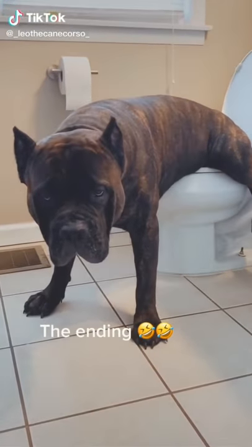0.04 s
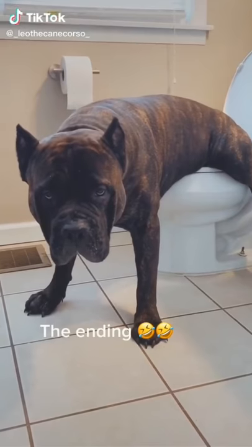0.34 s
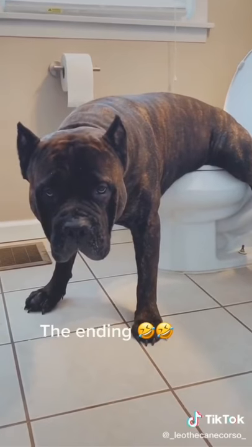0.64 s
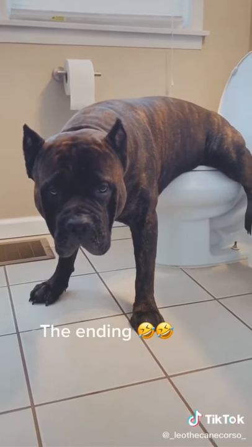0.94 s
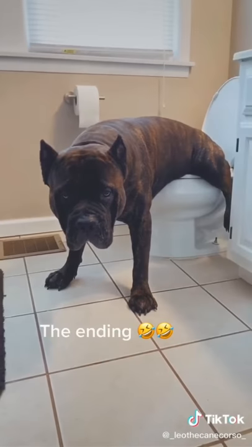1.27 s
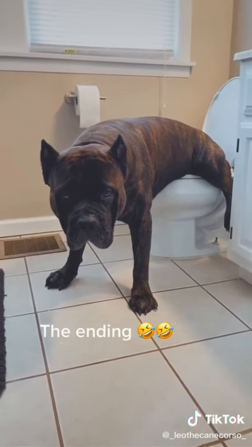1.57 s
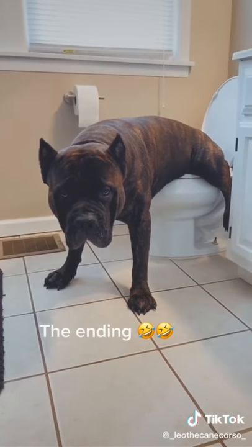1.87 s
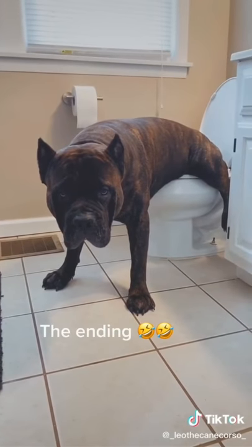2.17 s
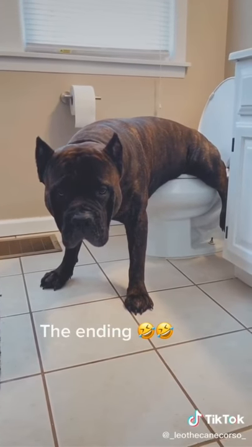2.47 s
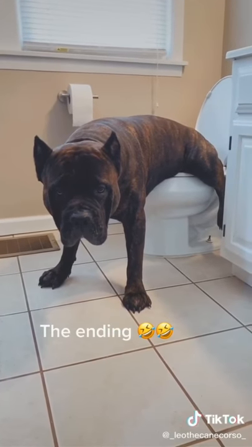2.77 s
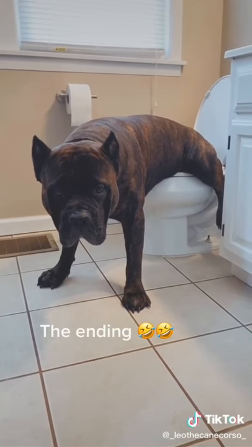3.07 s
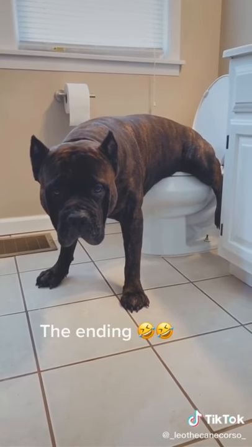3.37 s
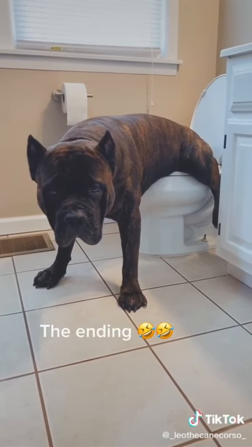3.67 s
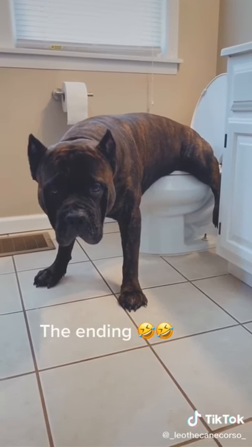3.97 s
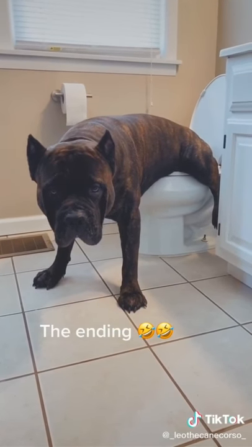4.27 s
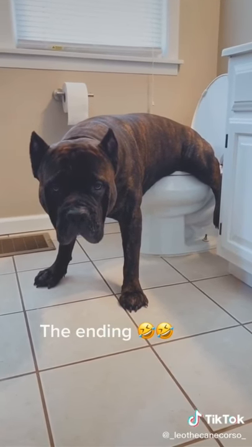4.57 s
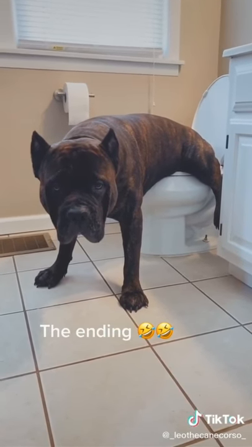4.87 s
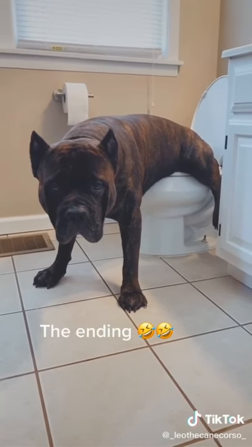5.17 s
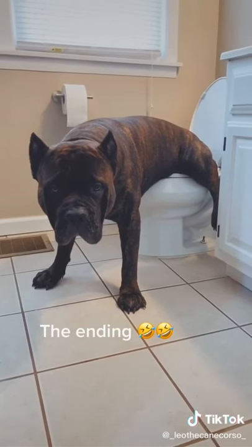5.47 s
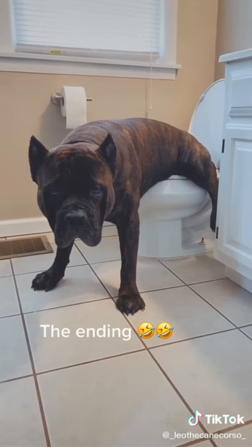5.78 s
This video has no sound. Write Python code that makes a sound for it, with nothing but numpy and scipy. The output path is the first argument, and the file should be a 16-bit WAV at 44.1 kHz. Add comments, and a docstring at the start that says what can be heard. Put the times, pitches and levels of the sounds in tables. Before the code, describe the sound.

Four wet gushes splash into a toilet bowl, each trailing off in fizz and drips, over a fan's hum in a tiled bathroom.

```python
'''A wet gush splashes into a toilet bowl, then three more, over a fan's hum in a tiled bathroom.
Each gush slaps the water, throws up spray and churns up air bubbles that boom in the bowl;
the last three spit a little ahead. Big bubbles sound low and hollow, tiny ones ping.
Each gush thins out into a fizz of bursting froth and a few separate drips, and the tiles echo.'''
import sys
import numpy as np
from scipy import signal
from scipy.fft import rfft, irfft, next_fast_len
from scipy.io import wavfile
from scipy.ndimage import uniform_filter1d

SR = 44100
rng = np.random.default_rng(int(sys.argv[2]) if len(sys.argv) > 2 else 0)


def output_pcm(signal):
    """Save a mono or channel-first signal as 16-bit PCM at the path in sys.argv[1].

    Samples are clipped to [-1, 1] before scaling.
    """
    pcm = np.clip(np.atleast_2d(signal).T, -1, 1) * 32767
    wavfile.write(sys.argv[1], SR, np.round(pcm).astype(np.int16))


N = 266342
TIME = np.arange(N) / SR
ATTACK_S = 0.006  # how quickly a gush or its spit starts


def amp(db):
    """Turns decibels into a gain, the number a sound is multiplied by."""
    return 10 ** (np.asarray(db) / 20)


def unit(x):
    """Scales a sound to an average (rms) level of 1."""
    return x / np.sqrt(np.mean(x ** 2) + 1e-20)


def read(points, hz):
    """Looks up a table by frequency, giving each octave equal room."""
    f, value = np.transpose(points)
    return np.interp(np.log(hz + 1), np.log(f), value)


def colour(x, spectrum):
    """Turns the lows and highs of a sound up or down along a smooth curve."""
    size = next_fast_len(len(x), True)
    gain = amp(read(spectrum, np.fft.rfftfreq(size, 1 / SR)))
    return irfft(rfft(x, size) * gain, size)[:len(x)]


def add(mix, s, sound):
    """Mixes a sound in at s seconds."""
    part = mix[max(round(s * SR), 0):][:len(sound)]
    part += sound[:len(part)]


def drift(per_s):
    """A curve that wanders at random, with an average (rms) size of 1."""
    knots = rng.standard_normal(1024)
    return unit(np.interp(TIME * per_s, np.arange(len(knots)), knots))


def steady(x, size):
    """Evens out the level over size samples and keeps the faster grain."""
    power = uniform_filter1d(uniform_filter1d(x ** 2, size), size)
    return x / np.sqrt(abs(power) + 1e-12)


def resonate(x, hz, width_hz):
    """Makes a sound ring around a pitch that may move."""
    turn = np.exp(2j * np.pi * np.cumsum(hz * np.ones(N)) / SR)
    decay = np.exp(-np.pi * width_hz / SR)
    return 2 * (turn * signal.lfilter([1 - decay], [1, -decay], x / turn + 1e-18)).real


def fan(air_db=-45):
    """The ventilation fan: wavering motor tones in the rumble of moving air."""
    # motor tones: f/Hz, level/dB, waver/dB
    motor = [(59.56, -44.5, -0.5), (119.9, -46.5, -0.1)]
    # tone colour of the moving air: f/Hz, gain/dB
    air_colour = [(12, -45), (25, -16), (33, -1.5), (44, -13.5), (60, -16), (78, 0.5), (98, -5.5),
                  (135, -4), (185, -13.5), (280, -17), (500, -20), (1200, -29), (4500, -40), (11000, -45.5),
                  (15500, -54)]
    tones = np.zeros(N)
    for hz, db, waver in motor:
        gain = np.sqrt(2) * amp(db + waver * drift(2.2))
        tones += gain * np.sin(2 * np.pi * (hz * TIME + rng.random()))
    return tones + amp(air_db) * unit(colour(rng.standard_normal(N), air_colour))


def room(x, echoes_per_s=4000):
    """Many echoes bounce off the tiles; the high ones die sooner."""
    # ring of the room: f/Hz, time to fade by 60 dB/s
    ring_times = [(250, 0.58), (700, 0.53), (2000, 0.53), (5000, 0.38), (12000, 0.36)]
    echoes = rng.choice([-1., 1.], SR) * (rng.random(SR) < echoes_per_s / SR)
    echoes[:SR // 200] = 0  # none in the first 5 ms
    hz, t, bands = signal.stft(echoes, SR, nperseg=256)
    fade = amp(-60 * t / read(ring_times, hz)[:, None])
    tail = signal.istft(bands * fade, SR, nperseg=256)[1]
    return signal.oaconvolve(x, tail / np.linalg.norm(tail))[:N]


def bowl(x, direct_db):
    """The air in the bowl rings at its own notes; some sound leaves directly."""
    # notes of the bowl: f/Hz, width/Hz, gain/dB
    notes = [(286, 4.7, 13), (352.5, 42, 3), (385, 2.6, -5.5), (436, 30, 0), (482.7, 10, 7), (537, 23, 4),
             (721, 16, -2), (820, 93, -5.5), (1108, 11, 6), (1286, 14, -2), (1425, 67, 4.5),
             (1740, 24.5, -3), (1800, 37, -8.5), (1847, 22, 5.5), (2098, 120, -7.5), (2875, 34, 10.5),
             (3260, 30, -10.5)]
    t = np.arange(SR // 4) / SR
    ring = np.zeros(len(t))
    for hz, width, db in notes:
        fade = np.exp(-np.pi * width * t)
        ring += amp(db) * 2 * np.pi * width / SR * fade * np.cos(2 * np.pi * hz * t)
    return amp(direct_db) * x + signal.oaconvolve(x, ring)[:N]


def porcelain(x, direct_db=0.5, life_s=0.0031):
    """Sound bounces around the hard bowl for a few milliseconds, which makes each tick sing."""
    t = np.arange(SR // 25) / SR
    bounces = rng.standard_normal(len(t)) * (rng.random(len(t)) < 3000 / SR)
    bounces *= np.exp(-t / life_s) * (t > .0006)
    response = bounces / np.linalg.norm(bounces) + amp(direct_db) * (t == 0)
    return signal.oaconvolve(x, response / np.linalg.norm(response))[:N]


def droplets(per_s, low_hz, high_hz, cycles, spread_db, pitches=24, size=700):
    """A shower of tiny bubbles, each a short ping that rises a little in pitch."""
    out, t = np.zeros(N), np.arange(size) / SR
    starts = np.flatnonzero(rng.random(N) < per_s / SR)
    height = amp(spread_db * np.minimum(rng.exponential(1, N)[starts], 4))
    height *= rng.choice([-1, 1], N)[starts]
    kind = rng.integers(0, pitches, N)[starts]
    for k, hz in enumerate(np.linspace(low_hz, high_hz, pitches)):
        life = cycles * rng.uniform(.4, 1.5) / hz
        rise = 1 + 0.016 * np.tanh(t / life)
        ping = np.exp(-t / life) * np.sin(2 * np.pi * hz * t * rise) / np.sqrt(life)
        places = starts[kind == k, None] + np.arange(size)
        out += np.bincount(places.ravel(), (height[kind == k, None] * ping).ravel(), N)[:N]
    return out


def spatter(spray_gain, froth_db=-52, full_db=-35, spread_db=5.5, fade_s=0.042, tries=130):
    """Picks stray drops at random: loud pings in strong spray, faint bright pops in the froth."""
    rows = []
    for when, size, pitch, splat in rng.random((tries, 4)):
        at = int(when * N)
        if spray_gain[at] > amp(-66):
            spray_db = 20 * np.log10(spray_gain[at])
            db = -22 + 0.68 * (spray_db - full_db) + spread_db * (2 * size - 1)
            hz = np.interp(spray_db, [froth_db, full_db], [10500, 3200 * (11500 / 3200) ** pitch])
            octaves = np.interp(spray_db, [froth_db, full_db], [1, 0.1 + 0.92 * splat])
            rows.append((at / SR, db, hz, octaves, fade_s))
    return rows


def drops(strays, skirt_db=-32):
    """A drop is a brief burst: a note when it traps a bubble, a hiss when it splats."""
    # drops that stand out: t/s, peak level/dB, f/Hz, width/octaves, time to fade by 60 dB/s
    clear_drops = [(0.0518, -19, 6850, 0.32, 0.037), (0.069, -14.5, 11500, 0.39, 0.023),
                   (0.182, -18, 7360, 0.2, 0.015), (0.2072, -19.5, 4760, 0.33, 0.049),
                   (0.222, -9, 8200, 0.75, 0.015), (0.241, -12.5, 9100, 0.16, 0.033),
                   (0.283, -21, 9620, 0.14, 0.025), (0.316, -20, 11500, .3, 0.034),
                   (0.351, -20, 8300, 0.21, 0.051), (0.3622, -13.5, 5440, 0.89, 0.04),
                   (0.363, -24, 1650, 0.73, 0.13), (0.375, -18, 4970, 0.66, 0.066),
                   (0.434, -26, 3700, 0.22, 0.018), (0.459, -25, 11500, 0.23, 0.01),
                   (0.4908, -20.5, 7340, .4, 0.08), (0.511, -18.5, 6760, 0.42, 0.03),
                   (0.529, -19, 4000, 0.18, 0.011), (0.542, -21, 7700, 0.21, 0.018),
                   (0.584, -28, 3700, 0.11, 0.056), (0.602, -32, 3750, 0.23, 0.071),
                   (0.6322, -23.5, 4700, 0.31, 0.031), (0.688, -37, 3620, 0.1, 0.2),
                   (0.772, -31.5, 3320, 0.17, 0.052), (0.796, -33.5, 3530, 0.15, 0.046),
                   (0.828, -43, 3600, 0.12, 0.063), (0.861, -39, 3500, .14, 0.063),
                   (0.893, -27.5, 9800, 2.3, 0.02), (0.991, -33, 6900, 1.2, 0.024),
                   (1.115, -36.5, 9550, 0.82, 0.036), (1.198, -35, 1110, 0.21, 0.02),
                   (1.2066, -33, 1390, 0.25, 0.025), (1.2313, -38, 1500, 0.58, 0.0072),
                   (1.255, -30, 9800, 0.47, 0.012), (1.255, -34, 10600, 0.074, 0.048),
                   (1.4545, -35, 5500, 3.3, 0.024), (1.453, -39, 3080, 0.34, 0.053),
                   (1.453, -47, 8100, 0.046, 0.085), (1.6473, -29.5, 7000, 1.7, 0.035),
                   (1.649, -32, 7000, 2.7, 0.38), (1.682, -18, 5530, 0.058, 0.0098),
                   (1.693, -18, 9800, 0.28, 0.014), (1.701, -11, 1590, 2, 0.033),
                   (1.712, -2, 6600, 0.59, 0.011), (1.719, -15, 2200, 0.69, 0.16),
                   (1.7592, -12, 3800, 0.35, 0.017), (1.797, -13, 4900, 0.52, 0.032),
                   (1.8154, -17.5, 3150, 0.17, 0.1), (1.8805, -14.5, 7470, 0.11, .014),
                   (1.94, -19, 8000, .2, 0.018), (1.9597, -16, 5700, 0.72, 0.017),
                   (1.9702, -13, 6500, 0.66, 0.031), (2.0645, -0.5, 6020, 0.33, 0.016),
                   (2.07, -10, 6070, 0.36, 0.022), (2.11, -25, 790, 0.57, 0.15),
                   (2.141, -19, 8000, 0.21, 0.05), (2.175, -22, 4340, 0.19, 0.021),
                   (2.206, -17, 8500, 0.27, 0.016), (2.2234, -15.5, 9100, 0.18, 0.023),
                   (2.2506, -18, 9040, 0.3, 0.018), (2.2788, -23.5, 3700, .2, .03),
                   (2.305, -31.5, 1370, 0.17, .12), (2.3225, -27.5, 3800, 0.08, 0.032),
                   (2.343, -34, 7540, 0.54, .014), (2.361, -27, 3950, 0.13, 0.023),
                   (2.378, -20, 4300, 0.7, 0.053), (2.382, -31, 1400, 0.24, 0.22),
                   (2.4155, -24.5, 4060, 0.098, 0.025), (2.53, -27.5, 5360, 0.62, 0.0091),
                   (2.599, -29.5, 7100, 0.084, 0.036), (2.669, -27, 9800, 0.78, 0.0095),
                   (2.701, -34.5, 6800, 0.68, 0.046), (2.832, -38, 8000, 0.53, 0.021),
                   (2.963, -38, 6700, 0.75, 0.039), (3.095, -44, 8900, 0.28, .05),
                   (3.423, -16, 9570, 0.52, 0.1), (3.444, -14.5, 5250, 0.48, 0.077),
                   (3.4871, -10, 5500, 0.94, 0.037), (3.497, -18, 2150, 0.27, 0.11),
                   (3.5, -22, 7500, 0.33, 0.025), (3.59, -9.5, 4200, 0.55, 0.026),
                   (3.596, -17, 7300, 0.18, 0.025), (3.622, -25, 7200, 0.23, .025),
                   (3.6618, -15, 6800, 0.18, 0.015), (3.672, -18.5, 8800, 0.29, 0.026),
                   (3.751, -41, 7000, 1, 0.014), (3.7935, -32, 6260, 0.52, 0.048),
                   (4.097, -33.5, 9800, 0.45, 0.0087), (4.155, -41, 11800, 0.27, .039),
                   (4.243, -38.5, 9350, 0.56, 0.043), (4.855, -40, 4520, 1.3, 0.18),
                   (5.047, -35, 8900, 0.6, 0.077), (5.06, -18, 8950, .55, .022),
                   (5.068, -15, 7360, 0.31, 0.032), (5.085, -24, 1740, 0.69, 0.33),
                   (5.098, -30, 800, 0.26, 0.065), (5.101, -29, 6500, .8, .025),
                   (5.127, -14, 6560, 0.87, 0.025), (5.134, -8.5, 3760, 1.2, 0.024),
                   (5.129, -27, 1800, 0.08, 0.29), (5.13, -30, 560, 0.37, 0.36),
                   (5.13, -40, 1445, 0.061, 0.24), (5.206, -26.5, 6000, 0.43, 0.025),
                   (5.402, -33, 5700, 0.64, 0.035), (5.476, -37, 8600, 0.21, 0.025),
                   (5.627, -46, 8600, 0.65, 0.014)]
    out, t = np.zeros(N), np.arange(-128, 15872) / SR
    hz, age = np.fft.rfftfreq(len(t), 1 / SR) + 1, np.maximum(t, 0)
    for s, db, centre, octaves, fade_s in clear_drops + strays:
        off_centre = np.log2(hz / centre) / octaves
        band = np.exp(-off_centre ** 2 / 4) + amp(skirt_db) / (1 + abs(off_centre))
        swell = 1 - np.exp(-age / (.025 * fade_s))  # long drops start softly
        shape = swell * amp(-60 * age / fade_s)
        fizz = steady(irfft(rfft(rng.standard_normal(len(t))) * band), size=64)
        burst = irfft(rfft(fizz * shape) * band)
        add(out, s + t[0], amp(db) * burst / abs(burst).max())
    return out


def froth(stop, level_db=-49, fade_db_per_s=17, lasts_s=0.66, ramp_s=0.24):
    """The gain of the foam that fizzes on after a gush stops, until it is used up."""
    age = np.maximum(TIME - stop, 0)
    ramp = np.clip(np.minimum(age, lasts_s - age) / ramp_s, 0, 1)
    return ramp * amp(level_db - fade_db_per_s * age)


def spit(start, lead, level_db=-24.5, fade_db_per_s=105.5):
    """The gain of the fine spray that reaches the bowl just before a gush."""
    age = np.maximum(TIME - start + lead, 0)
    return np.minimum(age / ATTACK_S, 1) * (TIME < start) * amp(level_db - fade_db_per_s * age)


def pour(start, landing_db, hold, swell, fade, level_db, landing_scale, fade_scale, impact_s=0.041):
    """The gain of one part of a gush: a hard landing, a slow swell or sag, then a fade."""
    age = np.maximum(TIME - start, 0)
    impact_db = landing_scale * landing_db * np.exp(-age / impact_s)
    body_db = swell * np.minimum(age, hold) - fade_scale * fade * np.maximum(age - hold, 0)
    return np.minimum(age / ATTACK_S, 1) * amp(level_db + impact_db + body_db)


def flow(surge_db=2, surges_per_s=24):
    """The surging gushes set the gains of spit, spray, slap and churn from moment to moment."""
    # gushes: t/s, spit lead/s, base landing boost/dB, pouring time/s, swell/(dB per s),
    # base fade/(dB per s), then relative levels: spray/dB, slap/dB, churn/dB
    gushes = [(-0.02, 0, 3, 0.59, 0.5, 92, -32.5, -33.5, -27.5),
              (1.708, 0.021, 3, 0.624, -9, 124, -28.5, -32.5, -22),
              (3.488, 0.071, 12.5, 0.14, -14, 85.5, -33.5, -30.5, -30),
              (5.125, 0.074, 12, 0.012, -10.5, 118, -38, -31.5, -23.5)]
    spit_gain, spray_gain, slap_gain, churn_gain = np.zeros((4, N))
    for start, lead, landing_db, hold, swell, fade, spray_db, slap_db, churn_db in gushes:
        shape = start, landing_db, hold, swell, fade
        spit_gain += spit(start, lead)
        pouring = pour(*shape, spray_db, landing_scale=1, fade_scale=1.95)
        spray_gain += np.hypot(pouring, froth(start + hold))
        slap_gain += pour(*shape, slap_db, landing_scale=0.23, fade_scale=0.97)
        churn_gain += pour(*shape, churn_db, landing_scale=0.12, fade_scale=0.77)
    surge = amp(surge_db * drift(surges_per_s))
    return spit_gain, spray_gain * surge, slap_gain * surge, churn_gain * surge


def babble(gain, per_s=170):
    """Middle-sized bubbles break loose from the stream, each a short clear note."""
    return gain * unit(droplets(per_s, 1265, 4280, cycles=17.4, spread_db=-1, pitches=40, size=2400))


def tinkle(gain, per_s=130):
    """Small bubbles that ring on for many cycles stand out of the spray as wet pings."""
    return gain * unit(droplets(per_s, 3400, 10580, cycles=30, spread_db=1.5, pitches=48, size=2000))


def churn(gain, per_s=200, width_hz=150):
    """Trapped air throbs at a pitch set by bubble size, and the bowl picks out its own notes."""
    # bubble pitch, lowest where the water plunges hardest: t/s, f/Hz
    bubble_pitch = [(0, 523), (.12, 430), (.25, 376), (.43, 384), (.58, 440), (.72, 536), (1.7, 298),
                    (1.9, 317), (2.0, 366), (2.1, 366), (2.24, 404), (2.45, 420), (3.49, 288), (3.56, 295),
                    (3.6, 334), (3.7, 370), (3.85, 441), (5.13, 435.5), (5.35, 500)]
    hz = np.interp(TIME, *np.transpose(bubble_pitch))
    kicks = rng.standard_normal(N) * (rng.random(N) < per_s / SR)
    bubbles = resonate(resonate(kicks, hz, width_hz), hz, width_hz)
    return gain * steady(bowl(bubbles, direct_db=-29.5), size=1800)


def plops(wobble_per_s=75, pitch_wobble=0.015, throb_db=1.0):
    """Big air pockets sound hollow notes that glide as they rise and wobble in the rough water."""
    # air pockets: t/s, peak level/dB, f/Hz, swell/s, time to fade by 60 dB/s, glide/(Hz per s)
    pockets = [(0.002, -35.5, 512, 0.0026, 0.15, 12), (0.008, -39, 385, .012, .16, 0),
               (0.012, -37.5, 290, 0.022, 0.57, -6), (0.02, -33, 667, 0.0064, .12, 0),
               (0.075, -27.5, 373, 0.0095, 0.16, 0), (0.105, -29, 530, 0.003, 0.076, -500),
               (0.128, -30.5, 910, 0.0031, 0.082, -200), (0.215, -22.5, 446, 0.011, 0.082, -400),
               (0.218, -32.5, 1105, 0.0075, 0.19, 0), (0.15, -27, 491, 0.011, 0.21, -300),
               (0.28, -29, 286, 0.0082, 0.28, 4), (0.284, -18.5, 422.5, 0.0053, 0.074, 0),
               (0.311, -16.5, 438, 0.0041, 0.06, 600), (0.378, -41, 818, 0.011, 0.13, -600),
               (0.403, -24.5, 398, .008, 0.17, 0), (0.42, -29.5, 737, 0.011, 0.26, 0),
               (0.47, -30, 736, 0.01, 0.15, 2000), (0.505, -30, 354, .01, 0.17, 0),
               (0.455, -29, 440, 0.0071, 0.1, 0), (0.548, -30.5, 475, .008, 0.094, 500),
               (0.578, -33, 940, 0.0038, 0.06, -7), (0.58, -33.5, 822, 0.007, .09, 0),
               (0.622, -35.5, 566, 0.0049, 0.24, 248), (0.668, -37, 1108, .014, 0.1, -10),
               (0.705, -42, 1094, 0.04, 0.31, -6), (0.785, -41, 286, 0.025, 0.2, 2),
               (0.852, -37, 588, 0.011, 0.075, 700), (1.713, -12.5, 292.5, 0.022, 0.11, 0),
               (1.718, -23, 357, 0.012, 0.082, 0), (1.72, -29.5, 740, .006, 0.13, -400),
               (1.818, -21, 325, 0.0062, 0.19, 300), (1.855, -19, 282.3, 0.0066, 0.37, 2),
               (1.936, -18.5, 286, 0.0045, 0.62, 3), (1.98, -10, 352.6, 0.02, 0.11, 244),
               (2.04, -31, 347.6, 0.0096, 0.15, 0), (2.205, -32, 1120, 0.006, 0.071, 1214),
               (2.249, -18.5, 443, 0.0052, 0.064, -500), (2.253, -32, 286, 0.0074, 0.73, -12.5),
               (2.315, -33, 387, 0.0066, 0.046, 498), (2.4385, -22, 773, 0.0031, 0.06, -900),
               (2.446, -27.5, 717, 0.0031, 0.27, -4), (2.45, -38, 772, 0.011, 0.5, -2),
               (3.488, -27.5, 740, 0.0017, 0.059, 0), (3.492, -13.5, 288.3, 0.035, 0.19, -8),
               (3.497, -29, 352, 0.0057, 0.1, 0), (3.545, -35.5, 592, 0.008, 0.081, 1201),
               (3.572, -19.5, 329, 0.033, 0.09, 900), (3.596, -29, 818, 0.0025, 0.04, -3500),
               (3.61, -41, 592, 0.0098, 0.12, 897.5), (3.64, -31.5, 358, 0.0043, 0.047, 18),
               (3.674, -21, 340.5, 0.0034, 0.21, 1103), (3.722, -33, 510, 0.003, 0.15, 1100),
               (3.71, -31.5, 746, 0.0023, 0.06, -400), (3.742, -36, 374, .004, 0.086, 0),
               (5.127, -35, 561, 0.0028, 0.08, -600), (5.128, -19.5, 767, 0.0018, 0.019, 0),
               (5.1268, -19.5, 480, 0.004, 0.055, -900), (5.176, -26, 445, .005, 0.074, 0),
               (5.135, -28, 345, 0.011, .24, 2), (5.150, -26, 424, 0.0096, 0.32, -2),
               (5.16, -42, 480.4, 0.0092, 0.84, 4), (5.225, -34, 530, 0.011, 0.35, -2)]
    out, t = np.zeros(N), np.arange(SR // 2) / SR
    squeeze = 1 + pitch_wobble * drift(wobble_per_s)
    throb = amp(throb_db * drift(wobble_per_s))
    for s, db, hz, swell, fade_s, glide in pockets:
        shape = (1 - np.exp(-(t / swell) ** 2)) * amp(-60 * t / fade_s)
        pitch = (hz + glide * t) * np.interp(s + t, TIME, squeeze)
        note = np.sin(2 * np.pi * np.cumsum(pitch) / SR)
        add(out, s, amp(db) * shape / shape.max() * note)
    return out * throb


def slap(gain, per_s=1400):
    """Lumps of liquid smack the surface and ring the bowl."""
    # tone colour of the smacks: f/Hz, gain/dB
    slap_colour = [(450, -2.5), (620, 3), (750, 6.5), (1200, -3.5), (2000, -1.5), (2800, -9), (3600, 0.5),
                   (6000, -44)]
    smacks = droplets(per_s, 583, 3700, cycles=2.5, spread_db=4)
    return gain * steady(colour(bowl(smacks, direct_db=-9.5), slap_colour), size=1500)


def spray(gain, spit_gain, froth_per_s=900, extra_per_s=900, densest_db=-30, ticks_db=-5, spots=5):
    """Pinging droplets and dry ticks, dense at full flow, thinning to the pops of froth."""
    # tone colour of the spray: f/Hz, gain/dB
    spray_colour = [(1500, 2.5), (2500, -4.5), (3300, -5.5), (4000, 2), (4700, -4.5), (5600, 0.5),
                    (8000, -2), (10000, -1.5), (11500, -9), (14000, -2), (15500, -1.5)]
    # added colour for the finer drops of the spit: f/Hz, gain/dB
    spit_colour = [(2000, -11), (3000, -1), (6000, -1.5), (14000, -0.5)]
    fullness = np.minimum((gain + spit_gain) / amp(densest_db), 1)
    per_s = (froth_per_s + extra_per_s * fullness) / spots
    crackle = np.zeros(N)
    for _ in range(spots):  # each landing spot in the bowl has its own bounces
        pings = unit(droplets(per_s, 2200, 13000, cycles=6.5, spread_db=4.6))
        ticks = unit(droplets(per_s, 3300, 13300, cycles=0.51, spread_db=5))
        crackle += porcelain(pings + amp(ticks_db) * ticks)
    crackle = unit(colour(steady(crackle, size=1500), spray_colour))
    return gain * crackle + spit_gain * colour(crackle, spit_colour)


def scene():
    """The splashing bowl and the fan in the tiled room, the same in both ears."""
    spit_gain, spray_gain, slap_gain, churn_gain = flow()
    splash = amp(-5) * spray(spray_gain, spit_gain) + amp(-12) * tinkle(spray_gain)
    splash += amp(-5.5) * slap(slap_gain) + amp(-15.5) * babble(slap_gain)
    gurgle = amp(-5.5) * churn(churn_gain)
    hum, booms = fan(), plops()
    drips = drops(spatter(spray_gain))
    echo = room(amp(-2) * splash + amp(-5.5) * drips + amp(-8.5) * (booms + gurgle))
    return np.tile(splash + gurgle + drips + booms + echo + hum, (2, 1))


def record(dry, edge_hz=15700):
    """The microphone softens the highest treble; everything above the edge is cut off."""
    droop = [(12000, -1.0), (14500, -9.5), (15800, -16.0)]  # f/Hz, gain/dB
    soft = np.array([colour(channel, droop) for channel in dry])
    treble_cut = signal.firwin(401, edge_hz, window=("kaiser", 9), fs=SR)
    return signal.oaconvolve(soft, treble_cut[None], "same")


dry = scene()
out = record(dry)
output_pcm(out)
```